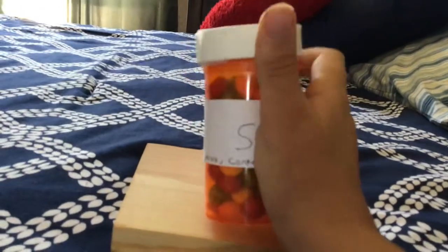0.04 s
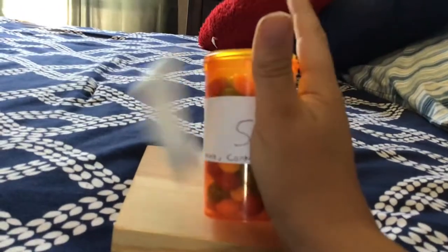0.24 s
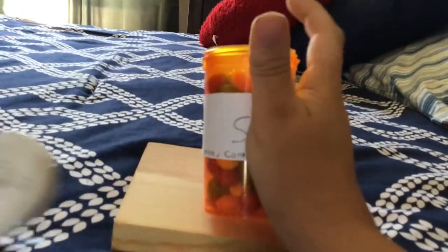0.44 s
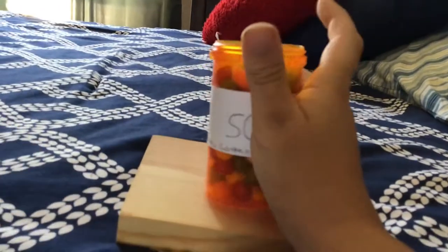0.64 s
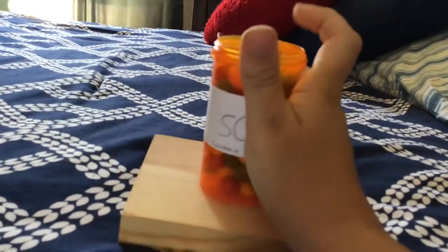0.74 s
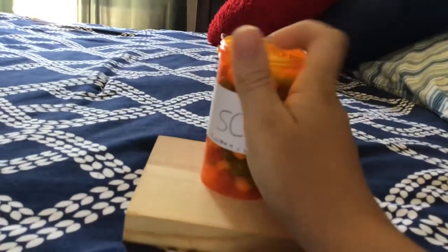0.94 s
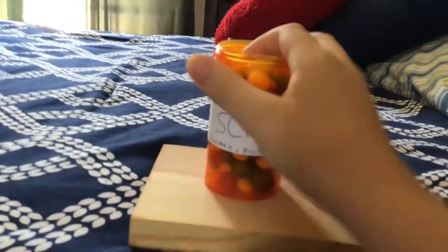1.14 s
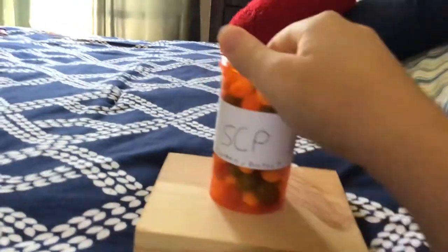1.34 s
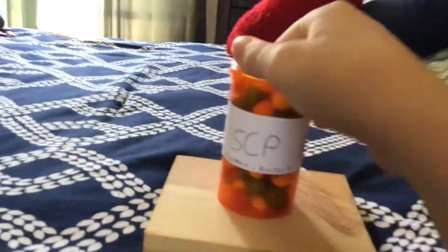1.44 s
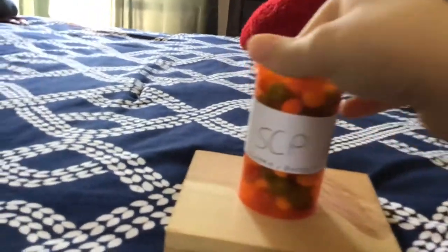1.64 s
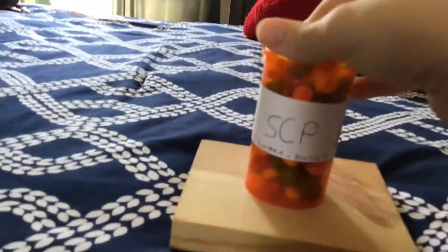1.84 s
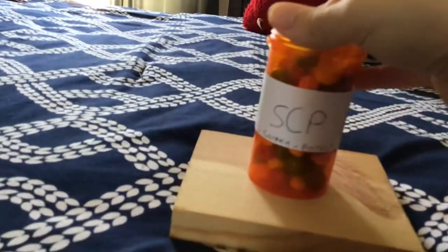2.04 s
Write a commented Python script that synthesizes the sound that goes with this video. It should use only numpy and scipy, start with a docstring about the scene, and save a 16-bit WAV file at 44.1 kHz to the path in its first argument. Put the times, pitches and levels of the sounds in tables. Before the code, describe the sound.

A plastic cap creaks and clicks on a pill bottle, then pops off at about 0.2 seconds with a sharp snap and a hollow knock. Softer taps on the open bottle come near 0.8 and 1.1 seconds. Sweets click inside, sharply at 1.4 seconds and in a light scatter from 1.7 to 2.1, with faint finger rubbing. Everything sounds close in a small quiet room.

```python
"""A plastic cap creaks, snaps free and knocks the rim as a thumb pops it off a pill bottle full of sweets.
Fingers then tap and rub the open bottle and the sweets click inside. The bottle stands on a wooden board
on a bed, in a small quiet room. Each knock rings the damped modes of the bottle's air and wall with a
low thump; the group delay of the recorder's high-pass draws the bass into a short falling chirp."""
import sys
import numpy as np
from scipy import signal
from scipy.fft import rfft, irfft
from scipy.io import wavfile
from scipy.ndimage import uniform_filter1d

SR = 44100
rng = np.random.default_rng(int(sys.argv[2]) if len(sys.argv) > 2 else 0)


def wrap_up_sound(samples):
    """Save the sound to the file named by the first command line argument, as 16-bit audio."""
    columns = np.atleast_2d(samples).T
    # keep every value between -1 and 1, then stretch to whole-number steps
    tamed = np.clip(columns, -1, 1)
    steps = np.round(tamed * 32767).astype(np.int16)
    wavfile.write(sys.argv[1], SR, steps)


N = 92610
FFT_SIZE = 2 ** 17
T = np.arange(N) / SR
HZ = np.maximum(np.arange(FFT_SIZE // 2 + 1) * SR / FFT_SIZE, 1)

# knocks on the bottle: (t/s, thump drive/dB, air drive/dB, wall drive/dB, contact cut-off/Hz)
KNOCKS = [(.0228, -48, 6, -5, 1150), (.0508, -11, -5, -17, 2530), (.1375, -7, -7, -32, 2440),
          (.1555, -11.5, -25, -26, 890), (.2255, 12.5, 17.5, 12.5, 5000), (0.2528, 14, 14, 19.5, 2600),
          (.7556, -1, 7.5, -21.5, 2000), (0.8743, -12, -30.5, -40, 371), (1.1343, -11, 3.5, -14.5, 1770),
          (1.3776, -18, 4.5, 3, 6150), (1.8824, -18, -20, -22, 2980), (2.0203, -17, -22, -38, 2980),
          (2.0872, -34, -12, -45, 4030)]
# modes of the enclosed air and of the plastic wall: (f/Hz, level/dB, T60/s)
AIR_MODES = [(817, 2, 0.052), (764, -5.5, .09), (1048, -21.5, .05)]
WALL_MODES = [(1466, -16.5, 0.21), (1477, 5.5, 0.039), (1582, -16.5, .05), (1820, -10, 0.43),
              (1840, -1.5, 0.13), (2150, -19, .05), (2500, -10.5, .07), (2670, -15.5, 0.22),
              (3160, -19.5, .18), (3300, -10, 0.17), (3600, -16.5, .14)]
# spectra of the thump, the cap's snap, all clicks and the rubbing: (f/Hz, level/dB)
THUMP_SPECTRUM = [(35, -32), (55, -14), (80, -4), (130, 1), (250, 1), (600, 1), (1100, -3), (2200, -4),
                  (4000, -12), (12000, -22)]
SNAP_SPECTRUM = [(500, -28), (1500, -1.5), (2300, -15.5), (2900, -20), (3400, 3.5), (4150, 2),
                 (4550, -12.5), (5050, 7), (5700, -17), (6500, -8.5), (7200, -7.5), (8100, -4.5),
                 (9500, -7), (10200, -15), (10900, -6), (13000, -20), (15500, -21)]
CLICK_SPECTRUM = [(200, -24.5), (700, -16), (1200, -14), (1600, -1.5), (2600, -3), (4200, -1), (7000, -2),
                  (9000, 4.5), (12000, 0), (16000, -7)]
RUB_SPECTRUM = [(200, -2), (600, 4.5), (850, 7), (1100, -3.5), (1600, 3), (3000, -1), (4300, 2),
                (7000, -6.5), (9500, -1.5), (13000, -8), (16000, -14)]
# clicks of cap and sweets: (t/s, level/dB, tilt/(dB per octave), ring f/Hz, time constant/s)
CLICKS = [(0.0182, -13, -5, 9300, 0.0011), (0.052, -20.5, -4.5, 8900, 0.0016),
          (0.0876, -20, -4.5, 9300, 0.0008), (0.0962, -22, 4, 8500, 0.00078), (0.1, -36, 9.5, 8800, 0.0005),
          (0.1026, -10, 2, 5700, 0.001), (0.1208, -18.5, -9, 9200, 0.0016),
          (0.1371, -16, -3.5, 8360, 0.0025), (0.1522, -20.5, -6, 7960, 0.0026),
          (0.2332, -9, -11, 3820, 0.0028), (0.2411, -9.5, -12.5, 3500, 0.0084),
          (0.2536, -7, -16, 2380, 0.003), (0.2552, -3.5, -4, 3660, 0.0026),
          (0.3814, -31, -8.5, 8120, 0.0014), (0.4547, -41.5, 1, 11820, 0.0018),
          (0.494, -39, 1, 10000, 0.00078), (0.7557, -21, -4, 1900, 0.0022), (1.012, -41, -9.5, 2483, 0.001),
          (1.0634, -32, -7, 8530, 0.0014), (1.071, -48, -17, 4370, 0.00095),
          (1.1096, -16.5, -2.3, 3570, 0.00057), (1.1348, -17, -6, 9050, 0.0042),
          (1.1396, -26.5, -13.5, 9900, 0.0012), (1.1473, -21.5, -7, 9500, 0.0036),
          (1.1692, -27, -5.5, 4300, 0.0013), (1.1999, -29.5, -4, 4900, 0.0012),
          (1.334, -26.5, -1.5, 3890, 0.00059), (1.344, -20.5, -4.5, 4300, 0.0025),
          (1.3675, -12.5, -3.5, 6600, 0.0015), (1.3776, 1, -5, 13440, 0.0023),
          (1.4047, -14, -1.5, 11100, 0.0011), (1.491, -18, -5, 9400, 0.0009),
          (1.5313, -16, -5.5, 10400, 0.0013), (1.623, -12.5, -3.5, 2480, 0.00057),
          (1.7202, -26.5, -6, 8440, 0.0019), (1.7396, -34, -8, 4200, 0.00059),
          (1.7538, -34, -7, 4200, 0.0018), (1.787, -32.5, -8, 8640, 0.0021),
          (1.81, -28.5, -6, 4270, 0.0038), (1.83, -21.5, -4.5, 4560, 0.0009),
          (1.8466, -31, -9, 4300, 0.0013), (1.8509, -18.5, -6, 9400, 0.0018),
          (1.882, -12.5, -3.8, 11500, 0.0011), (1.893, -8, -4.5, 4270, 0.00096),
          (1.912, -24, -3, 2500, 0.00087), (1.9702, -21, -5.5, 9100, 0.00063),
          (1.9853, -21.5, -3, 1660, 0.001), (1.9929, -20, -6.5, 9900, 0.0012),
          (2.01, -16.5, -5, 4230, 0.0012), (2.02, -13.5, -1.5, 3210, 0.00087),
          (2.057, -33, -8, 4300, 0.0011), (2.087, -14, -3.5, 11800, 0.0013)]
# envelope of fingers and sweets rubbing on the plastic: (t/s, level/dB)
RUB_ENVELOPE = [(0, -43), (.035, -59), (.07, -69), (.11, -69), (.19, -66.5), (.5, -70), (.6, -73.5),
                (1.02, -76), (1.08, -61.5), (1.135, -54.5), (1.22, -67.5), (1.325, -71), (1.35, -48.5),
                (1.39, -50), (1.45, -65), (1.68, -67.5), (1.79, -74), (1.87, -69.5), (1.91, -54),
                (1.95, -77), (2.03, -53), (2.1, -76)]
# soft bumps on bedding and board: (t/s, level/dB, Gaussian half width/s, f/Hz)
BUMPS = [(0.414, -58, 0.015, 246), (0.439, -63, 0.022, 80), (0.497, -59.5, 0.017, 211.6),
         (0.533, -61, .02, 128.2), (0.604, -64.5, 0.017, 223.7), (0.631, -62, 0.024, 99.6),
         (.82, -66.5, 0.024, 95.2), (.879, -58, 0.0056, 247), (.94, -71.5, 0.025, 90),
         (1.143, -49, 0.0066, 181), (1.234, -68, 0.017, 119), (1.3, -67, 0.023, 110),
         (1.518, -72.5, 0.025, 107.5), (1.617, -60.5, .012, 356), (1.642, -63.5, 0.015, 97),
         (1.9, -74, 0.02, 86)]
# skin sliding over plastic: (t/s, level/dB, Gaussian half width/s, f/Hz)
SWISHES = [(.4, -77.5, 0.025, 9600), (.51, -69.5, 0.027, 5600), (.52, -72, 0.036, 9800),
           (.68, -69.5, 0.016, 7870), (.92, -75.5, 0.026, 9500), (1.26, -72.5, .035, 10900)]
# early reflections: (delay t/s, level/dB)
REFLECTIONS = [(.0088, -22.5), (0.0152, -24), (0.0184, -27.5)]
# decay times of the reverberation: (f/Hz, T60/s)
REVERB_T60 = [(150, 0.22), (1500, 0.27), (4000, 0.18), (14000, 0.41)]
# spectra of the reverberation and of the room's background noise: (f/Hz, level/dB)
REVERB_SPECTRUM = [(100, -19), (400, -17), (850, -19), (1200, -15.5), (1500, -12.5), (1850, -14.5),
                   (2300, -15), (2900, -9), (3500, -13), (5000, -15.5), (7000, -15), (15000, -20)]
BACKGROUND_SPECTRUM = [(30, -23), (60, 7.5), (110, 6), (380, -0.5), (650, -9.5), (850, -6.5), (1250, -18.5),
                       (1800, -16.5), (7000, -19.5), (9700, -17), (13000, -18.5), (16000, -30.5)]


def knocks(lag_cycles=1.55, lag_below_hz=1100):
    """Impact excitation: a contact drives thump, air and wall; the softer it is, the less treble."""
    drives = np.zeros((3, N))
    impulse = signal.unit_impulse(8192) + 1e-18
    for start_s, thump_db, air_db, wall_db, cutoff_hz in KNOCKS:
        force = signal.sosfilt(signal.butter(2, cutoff_hz, fs=SR, output="sos"), impulse)
        for drive, db in zip(drives, (thump_db, air_db, wall_db)):
            add(drive, start_s, from_db(db) * force)
    # the recorder's high-pass delays each low frequency by about lag_cycles of its own periods
    high_pass_lag = np.exp(-2j * np.pi * lag_cycles * np.log(HZ / (HZ + lag_below_hz)))
    bodies = from_db(at_hz(THUMP_SPECTRUM)), resonances(AIR_MODES), resonances(WALL_MODES)
    return sum(filtered(drive, body * high_pass_lag) for drive, body in zip(drives, bodies))


def resonances(modes):
    """Modal superposition: the responses of damped oscillators add, each with its level at resonance."""
    response = 0
    for hz, db, t60 in modes:
        detuning = np.pi * t60 / np.log(1000) * (HZ - hz ** 2 / HZ)
        response += from_db(db) * 1j * HZ / hz / (1 + 1j * detuning)
    return response


def cap_snap(start_s=.2255, gain_db=13, decay_s=.00067):
    """Sudden elastic release: the lip of the cap lets go of the rim in one bright crack."""
    out = np.zeros(N)
    add(out, start_s, crack(decay_s, gain_db + at_hz(SNAP_SPECTRUM)))
    return out


def clicks(gain_db=-1.5, ring_db=9.5, ring_octaves=.091):
    """Brief hard contacts radiate broadband clicks, each with its own spectral tilt and one resonance."""
    out = np.zeros(N)
    colour_db = gain_db + at_hz(CLICK_SPECTRUM)
    octaves = np.maximum(np.log2(HZ / 4000), -2)  # the tilt pivots at 4 kHz and is flat below 1 kHz
    for start_s, db, tilt, hz, decay_s in CLICKS:
        peak_db = ring_db * np.exp(-.5 * (np.log2(HZ / hz) / ring_octaves) ** 2)
        add(out, start_s, crack(decay_s, db + colour_db + tilt * octaves + peak_db))
    return out


def crack(decay_s, colour_db, spike=.12, size=2048):
    """Modal overlap: after a spike, the plastic's dense modes merge into fast-decaying noise."""
    burst = rng.standard_normal(size) * np.exp(-T[:size] / decay_s)
    burst /= np.linalg.norm(burst)
    burst[0] += spike
    spectrum = rfft(burst)
    # flatten the burst's broad spectral shape, then impose the colour
    broad_db = 10 * np.log10(uniform_filter1d(abs(spectrum) ** 2, size=70))
    return irfft(spectrum * minimum_phase(colour_db[::FFT_SIZE // size] - broad_db))


def rubbing(slips_per_s=5000, spread_db=4.5):
    """Stick-slip friction: tiny slips of random size and timing along the plastic merge into a rustle."""
    sizes = from_db(spread_db * np.minimum(rng.exponential(1, N), 5))
    signs = rng.choice([-1, 1], N)
    slips = sizes * signs * (rng.random(N) < slips_per_s / SR)
    rustle = unit_rms(filtered(slips, minimum_phase(at_hz(RUB_SPECTRUM))))
    return from_db(np.interp(T, *np.transpose(RUB_ENVELOPE))) * rustle


def soft_contacts(contacts, octaves):
    """Gradual contact has no sharp onset: each bump or slide is a Gaussian swell of band-limited noise."""
    out = np.zeros(N)
    edge_ratio = 2 ** (octaves / 2)
    for centre_s, db, half_width_s, hz in contacts:
        envelope = np.exp(-.5 * ((T - centre_s) / half_width_s) ** 2)
        swell = envelope * band_noise(hz / edge_ratio, hz * edge_ratio, N)
        out += from_db(db) * swell * np.linalg.norm(envelope) / np.linalg.norm(swell)
    return out


def reverberation(sound, onset_s=.0017):
    """Reflection and absorption: early echoes and a diffuse tail that decays at its own rate per band."""
    t = T[:SR // 2]
    tail = np.zeros(len(t))
    build_up = 1 - np.exp(-(t / onset_s) ** 2)
    edges_hz = np.geomspace(60, 18000, 9)
    for low, high in zip(edges_hz, edges_hz[1:]):
        envelope = build_up * from_db(-60 * t / at_hz(REVERB_T60, np.sqrt(low * high)))
        tail += band_noise(low, high, len(t)) * envelope / np.linalg.norm(envelope)
    out = filtered(sound, rfft(tail, FFT_SIZE) * minimum_phase(at_hz(REVERB_SPECTRUM)))
    for delay_s, db in REFLECTIONS:
        add(out, delay_s, from_db(db) * sound)
    return out


def background(level_db=-71):
    """Stationary noise: the quiet room's faint rumble and hiss."""
    noise = filtered(rng.standard_normal(FFT_SIZE), from_db(at_hz(BACKGROUND_SPECTRUM)))
    return from_db(level_db) * unit_rms(noise)


def from_db(db):
    """Amplitude ratio of a level in decibels."""
    return 10 ** (np.asarray(db) / 20)


def unit_rms(x):
    """Normalisation to unit power."""
    return x / np.sqrt(np.mean(x ** 2) + 1e-20)


def at_hz(points, hz=HZ):
    """Interpolation of a table along log frequency."""
    f, value = np.transpose(points)
    return np.interp(np.log(hz), np.log(f), value)


def minimum_phase(db):
    """Causality: folding the cepstrum gives a gain curve its minimum-phase response."""
    cepstrum = irfft(db * np.log(10) / 20)
    half = len(cepstrum) // 2
    cepstrum[1:half] *= 2
    cepstrum[half + 1:] = 0
    return np.exp(rfft(cepstrum))


def filtered(x, response):
    """Convolution as a product of spectra."""
    return irfft(rfft(x, FFT_SIZE) * response)[..., :N]


def band_noise(low_hz, high_hz, size):
    """Band-pass filtering of white noise."""
    band = signal.butter(2, [low_hz, high_hz], "band", fs=SR, output="sos")
    return signal.sosfilt(band, rng.standard_normal(size))


def add(out, start_s, sound):
    """Superposition of a delayed sound, in place."""
    i = int(start_s * SR)
    out[i:i + len(sound)] += sound[:N - i]


def scene():
    """Superposition of the bottle, its reverberation, soft handling noises and the background."""
    bottle = knocks() + cap_snap() + clicks() + rubbing()
    ambience = background()
    room = reverberation(bottle)
    bumps = soft_contacts(BUMPS, octaves=1)
    swishes = soft_contacts(SWISHES, octaves=.31)
    return (bottle + room + bumps + swishes + ambience)[None]


def record(dry, low_cut_hz=48, high_cut_hz=16300):
    """Band limiting: steep filters remove the deepest rumble and the highest treble."""
    high_passed = filtered(dry, 1 / np.sqrt(1 + (low_cut_hz / HZ) ** 8))
    return signal.sosfilt(signal.ellip(10, .2, 80, high_cut_hz, fs=SR, output="sos"), high_passed)


dry = scene()
out = record(dry)
wrap_up_sound(out)
```